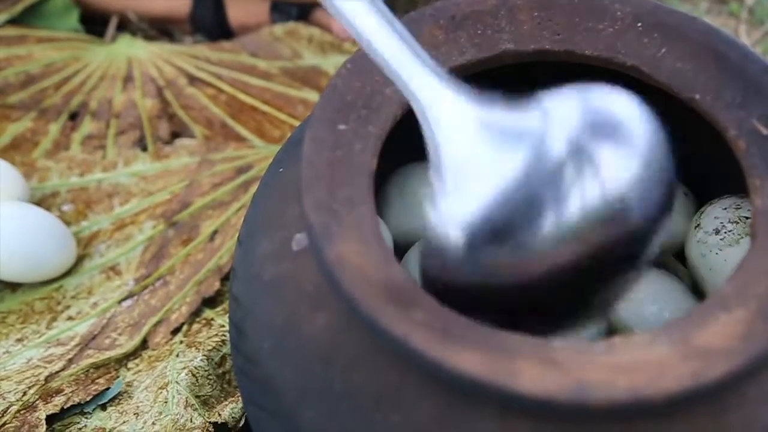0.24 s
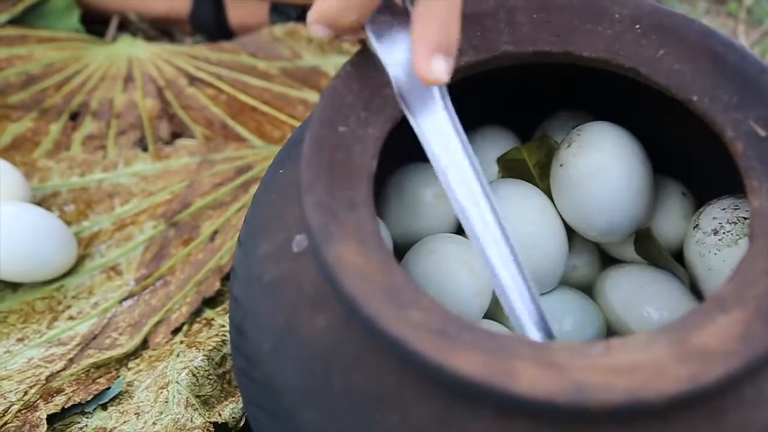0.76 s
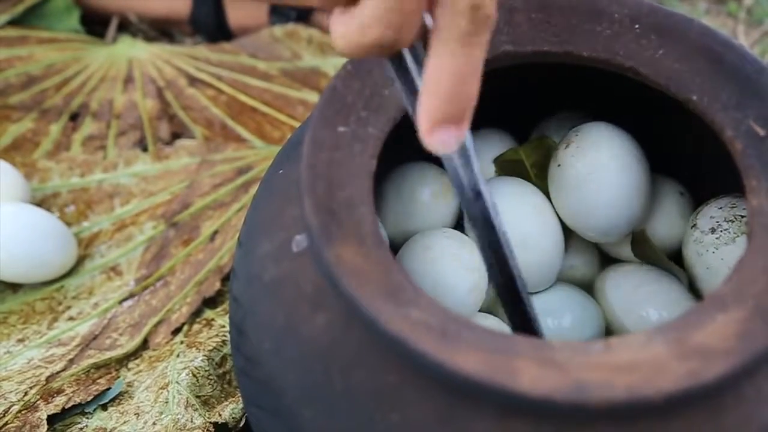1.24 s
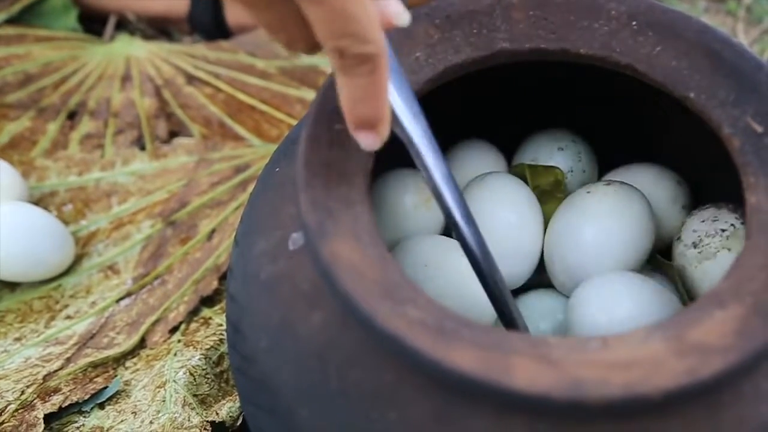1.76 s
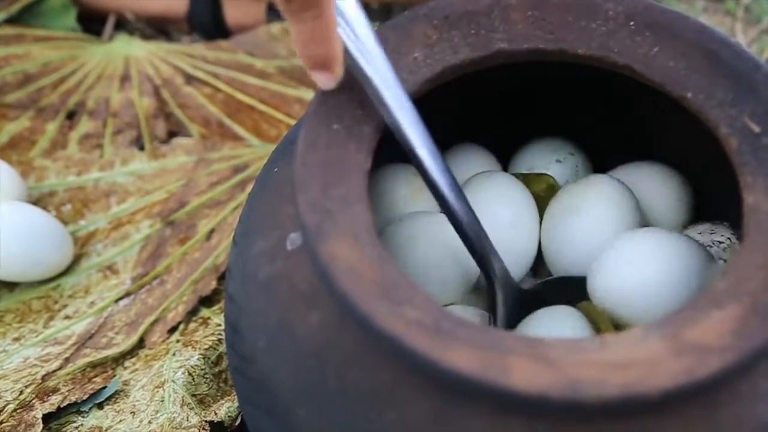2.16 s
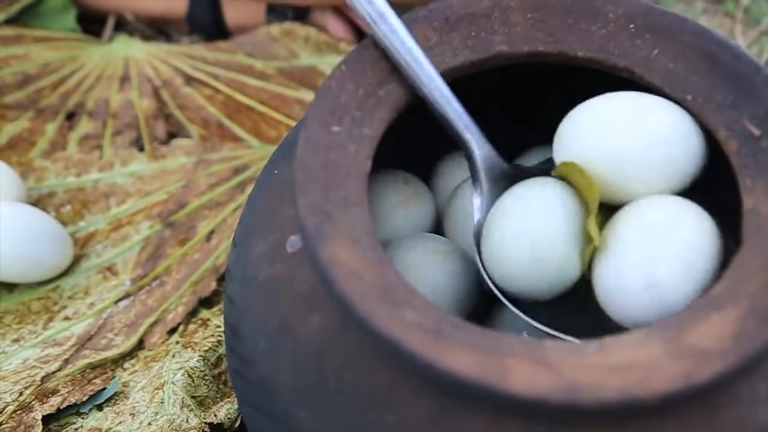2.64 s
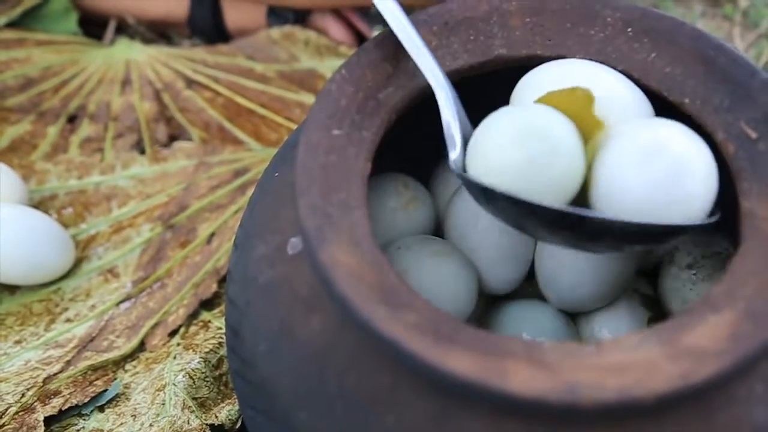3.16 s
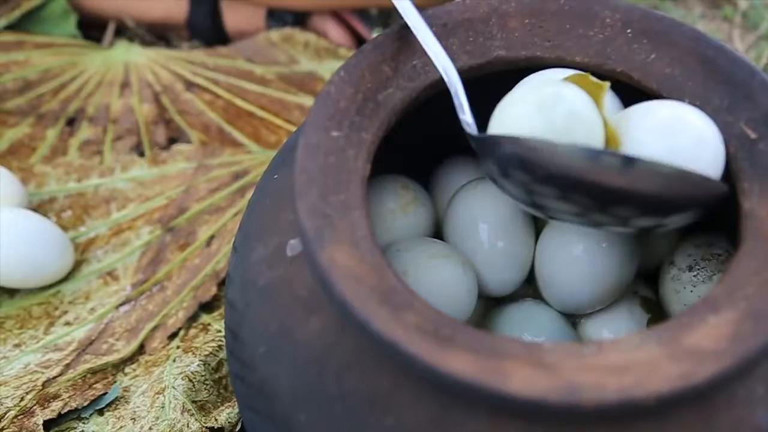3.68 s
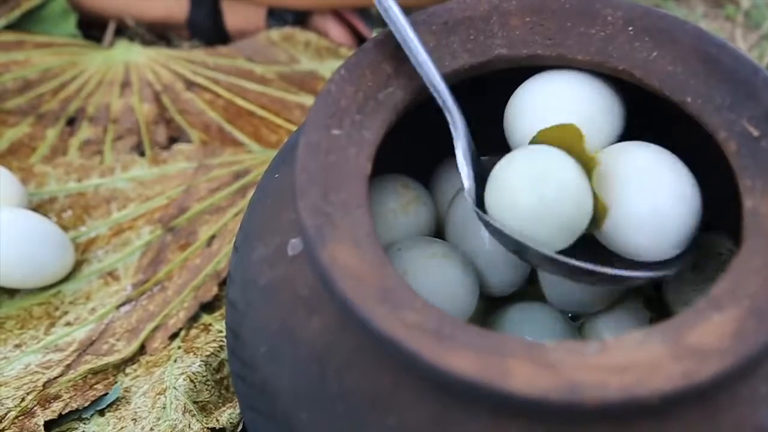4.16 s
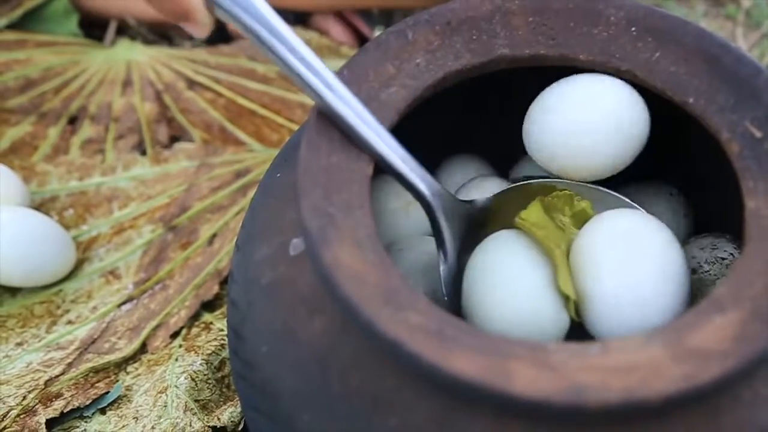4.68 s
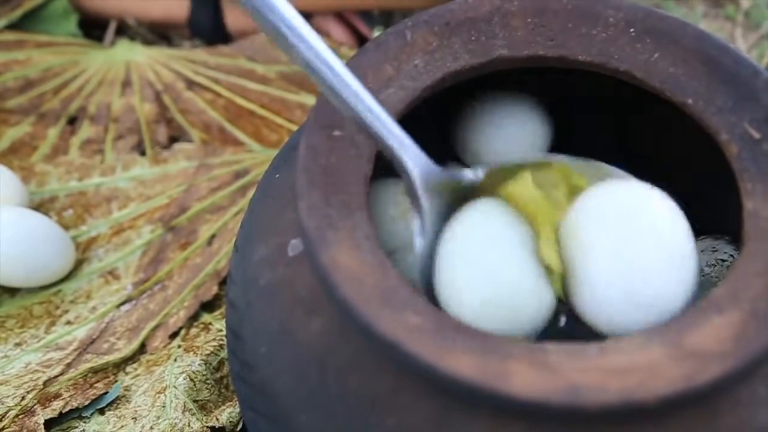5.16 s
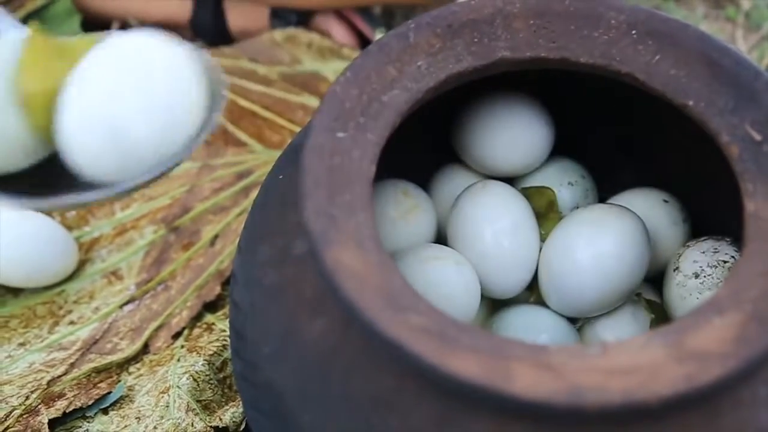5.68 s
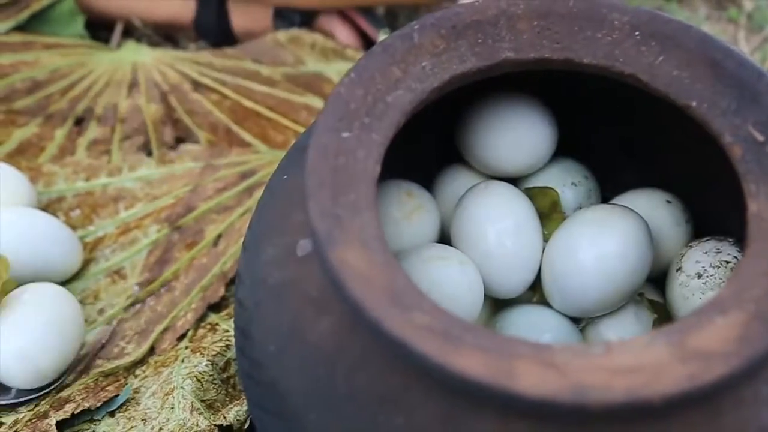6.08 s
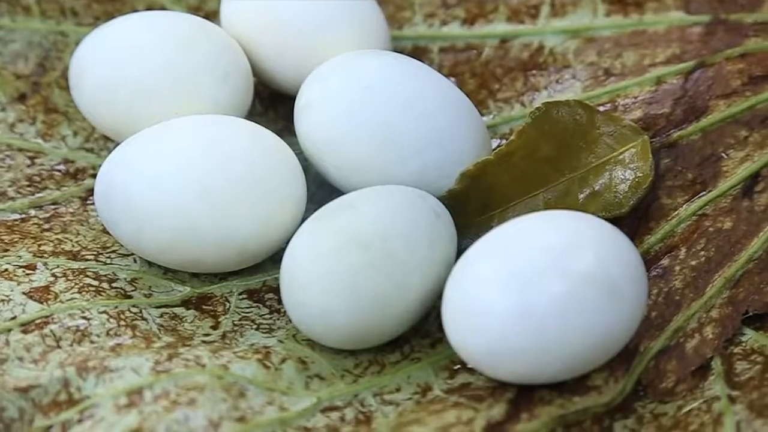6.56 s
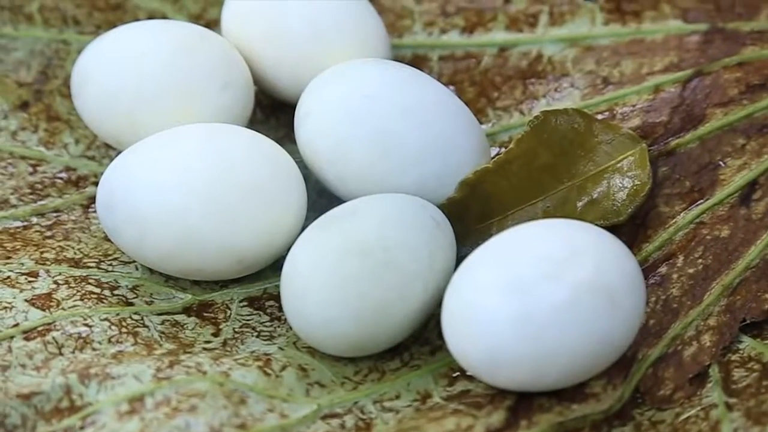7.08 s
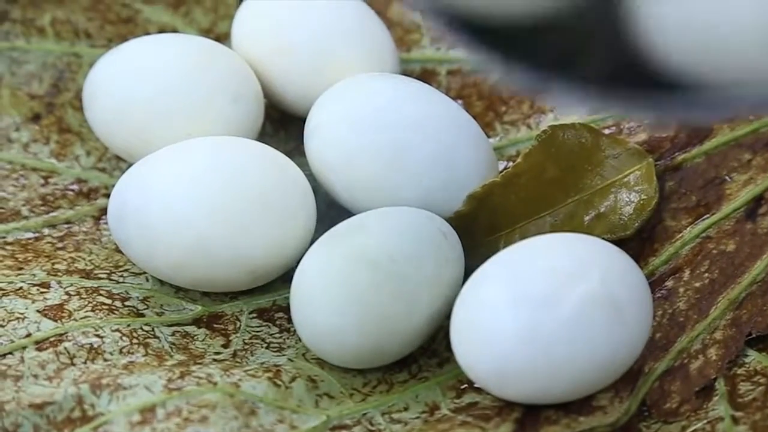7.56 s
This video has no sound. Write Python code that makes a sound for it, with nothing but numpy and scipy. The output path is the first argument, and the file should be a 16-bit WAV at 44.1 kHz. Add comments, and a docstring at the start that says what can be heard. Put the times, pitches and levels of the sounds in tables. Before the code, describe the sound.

Close to the microphone outdoors, low wind rumbles and flutters in uneven gusts over faint hiss. A steel ladle clinks into a clay pot, squeals briefly along its rim and clacks among eggs. Shells knock, scrape and tick, easing to faint contacts, then a dense hollow clatter. After a tiny dropout to silence, a few softer taps follow and only wind remains.

```python
"""Wind rumbles and flutters on a microphone over faint hiss and a thin high whine: shaped noise and a sine.
Then a steel ladle digs among eggs in a clay pot outdoors. Shells knock, crack and tick as short noise
bursts through resonances; the pot and the ladle's bowl answer with decaying modes.
Rubs, scrapes and rim squeals are dense random grains through resonances.
Late on, the sound drops out for an instant."""
import sys
import numpy as np
from scipy import signal
from scipy.fft import rfft, irfft
from scipy.io import wavfile
from scipy.ndimage import uniform_filter1d

SR = 44100
rng = np.random.default_rng(int(sys.argv[2]) if len(sys.argv) > 2 else 0)


def output_pcm(signal):
    """Save a mono or channel-first signal as 16-bit PCM at the path in sys.argv[1].

    Samples are clipped to [-1, 1] before scaling.
    """
    pcm = np.clip(np.atleast_2d(signal).T, -1, 1) * 32767
    wavfile.write(sys.argv[1], SR, np.round(pcm).astype(np.int16))


def volts(x):
    """Linear amplitude factor 10**(x/20) for a level x in dB, scalar or array-like."""
    e = np.asarray(x, float) / 20
    return 10 ** e


N = 345303  # length in samples


def rms_one(x):
    """Scale to rms 1."""
    return x / np.sqrt(np.mean(x ** 2) + 1e-20)


def peak_one(x):
    """Scale to a peak of 1."""
    return x / np.abs(x).max()


def in_time(rows):
    """Draw a (time, level) curve sample by sample."""
    s, level = np.transpose(rows)
    return np.interp(np.arange(N) / SR, s, level)


def band(x, low_hz, high_hz):
    """Band-pass."""
    edges = [low_hz, min(high_hz, SR / 2.2)]
    return signal.sosfilt(signal.butter(2, edges, "band", fs=SR, output="sos"), x)


def drift(rate):
    """Smooth random wander with a spread of about 1; a higher rate moves faster."""
    r = np.exp(-80 * np.pi * rate / SR)  # one step every 40 samples
    noise = rng.standard_normal(N // 40 + 2002)
    slow = signal.lfilter([1], [1, -2 * r, r * r], noise)[2000:]
    return np.interp(np.arange(N) / 40, np.arange(len(slow)), rms_one(slow))


def ring(x, hz, t60):
    """One vibrating mode: a unit click starts a decaying sine of height 1."""
    r, w = volts(-60 / (t60 * SR)), 2 * np.pi * hz / SR
    return signal.lfilter([0, np.sin(w)], [1, -2 * r * np.cos(w), r * r], x + 1e-18)


def resonance(x, hz, width_hz):
    """A resonance with gain 1 on top."""
    r = np.exp(-np.pi * width_hz / SR)
    poles = [1, -2 * r * np.cos(2 * np.pi * hz / SR), r * r]
    return signal.lfilter([(1 - r * r) / 2, 0, (r * r - 1) / 2], poles, x)


def coloured(spectrum):
    """Noise of a given spectrum, rms 1."""
    hz = np.maximum(np.arange(N // 2 + 1) * SR / N, 1)
    table_hz, table_db = np.transpose(spectrum)
    db = np.interp(np.log(hz), np.log(table_hz), table_db)
    return rms_one(irfft(rfft(rng.standard_normal(N)) * volts(db), N))


def grains(per_s, spread_db, clump_db):
    """Uneven micro-contacts of a rough surface, about per_s before clumping; rms 1."""
    sizes = volts(spread_db * np.minimum(rng.exponential(1, N), 4)) * rng.choice([-1, 1], N)
    chance = per_s * volts(clump_db * drift(40)) / SR
    return rms_one(sizes * (rng.random(N) < chance))


# wind strength on the microphone: start_s, rumble_db
WIND = [(0.0, -24.5), (0.05, -16.5), (0.74, -26.5), (0.83, -15.5), (1.0, -24), (1.2, -26.5), (1.35, -17.5),
        (1.4, -31.5), (1.72, -17), (1.9, -19.5), (2.55, -17.5), (2.6, -22), (2.75, -14.5), (2.85, -22.5),
        (3.16, -25.5), (3.31, -19), (3.5, -21.5), (3.55, -16.5), (3.66, -17.5), (3.75, -13), (3.9, -16),
        (4.1, -14), (4.34, -19), (4.48, -14.5), (4.7, -19), (4.97, -22.5), (5.17, -16), (5.24, -27),
        (5.49, -26), (5.53, -17), (5.65, -21), (5.75, -15), (6.3, -15.5), (6.65, -22), (7.28, -22),
        (7.33, -14.5), (7.7, -19.5), (7.83, -14.5)]
# hiss strength: start_s, level_db
HISS_LEVEL = [(0.0, -44.5), (1.35, -46.5), (1.79, -43.5), (7.83, -50.5)]
# relative noise spectra of the three layers, per Hz: freq_hz, density_db
RUMBLE_SPECTRUM = [(8.8, -7.5), (15, 6), (59, 1.5), (92, 3), (200, -23), (260, -28.5), (440, -120)]
FLUTTER_SPECTRUM = [(110, 5.5), (150, 11.5), (220, 3), (320, -6.5), (500, -44)]
HISS_SPECTRUM = [(200, -10), (320, 0), (600, -4), (1000, -7), (2000, -10), (4000, -15), (9000, -19),
                 (10500, -24), (15600, -27), (15900, -60)]
# flutter at a rumble of -20 dB, before its random swings; dB gained per dB of rumble
FLUTTER_DB, FLUTTER_STEEPNESS = -37.5, 2.07
WHINE_HZ, WHINE_DB = 15661, -64  # rms


def air():
    """Wind pressure as low noise, a flutter that grows faster than the rumble, hiss and a sine whine."""
    rumble_db = in_time(WIND)
    flutter_db = FLUTTER_DB + FLUTTER_STEEPNESS * (rumble_db + 20) + 2.34 * drift(4.6)
    rumble = coloured(RUMBLE_SPECTRUM)
    # gusts come in lumps of fairly even strength
    rumble = rms_one(rumble / (uniform_filter1d(rumble ** 2, size=3500) + 0.3) ** .5)
    flutter = coloured(FLUTTER_SPECTRUM) * volts(flutter_db + 4.44 * drift(51.5))
    hiss = coloured(HISS_SPECTRUM) * volts(in_time(HISS_LEVEL) + .8 * drift(8))
    whine = np.sqrt(2) * volts(WHINE_DB) * np.sin(2 * np.pi * WHINE_HZ * np.arange(N) / SR)
    return rumble * volts(rumble_db) + flutter + hiss + whine


def ticks():
    """Faint settling of wet shells while the ladle is in the pot: grains smeared over milliseconds."""
    t = np.arange(N) / SR
    lone = grains(36, spread_db=2.5, clump_db=4.0) * ((t > .45) & (t < 5.4))
    envelope = signal.lfilter([1], [1, -volts(-60 / (0.023 * SR))], np.abs(lone))  # t60 of 23 ms
    puffs = envelope * rng.standard_normal(N)
    return volts(-57.5) * rms_one(band(puffs, 1400, 5600))


# modes of the steel ladle: freq_hz, level_db, t60_s, family (the column of CLINKS that drives it)
LADLE = [(1077, -12, .1, 1), (1495, -14, .16, 1), (1906, -16, .12, 1), (2234, -12, .1, 1),
         (3623, -4, .5, 2), (5157, 3, .33, 3), (5696, -8, .08, 3), (7200, -4, .08, 4), (8570, 0, .06, 4),
         (9480, -2, .08, 4), (10250, -5, .08, 4), (12650, -5, .05, 4), (14150, -4, .04, 4),
         (14500, -1, .04, 4), (14840, -4, .06, 4)]
# clinks of the freely swinging bowl: start_s, lower_modes_db, mode_3600_hz_db, mode_5200_hz_db, upper_modes_db
CLINKS = [(0.4587, -15, -41, -35.5, -41), (0.4823, -24, -26.5, -42, -38), (0.506, -43, -52, -60, -56),
          (0.612, -52, -50, -62, -46), (0.6704, -25.5, -55, -56, -43), (0.6968, -37, -38, -45, -40),
          (0.722, -40, -55, -56, -50), (4.1518, -28, -48, -61, -55), (4.4563, -43, -60, -66, -47),
          (4.565, -48, -60, -83, -52), (4.6443, -25, -55, -74, -41), (4.9671, -38, -55.5, -67, -49)]
BOWL_TOUCHES_S, BOWL_MUTE_S = 0.726, 0.02  # the bowl sinks among the eggs and its ringing dies


def clinks(spread_db):
    """Every clink sets the modes of the free bowl ringing, by family and with some chance."""
    rows = np.array(CLINKS)
    at = np.round(rows[:, 0] * SR).astype(int)
    luck, out = rng.standard_normal((len(at), len(LADLE))), np.zeros(N)
    for k, (hz, db, t60, family) in enumerate(LADLE):
        clicks = np.zeros(N)
        clicks[at] = volts(rows[:, round(family)] + db + spread_db * luck[:, k])
        out += ring(clicks, hz, t60) * (-1) ** k
    # silence the ringing for the rest of a second, until later clinks may sound
    since = np.arange(N) / SR - BOWL_TOUCHES_S
    return out * np.where(since < 1, np.clip(1 - since / BOWL_MUTE_S, 0, 1), 1)


# resonances of the heap of eggs: freq_hz, width_hz, level_db
HEAP = [(693, 98, 0), (1050, 430, -2), (1457, 310, -1), (1774, 144, 5.5), (2107, 460, 1.5),
        (2460, 180, 1.5), (2665, 225, -1), (3530, 230, -4), (4200, 280, -8.5)]


def heap(x, luck_db):
    """The resonances of the eggs lying in the pot; each touch favours other ones."""
    return sum(volts(db + luck) * resonance(x, hz, width) * (-1) ** k
               for k, ((hz, width, db), luck) in enumerate(zip(HEAP, luck_db)))


# modes of the clay pot: freq_hz, level_db, t60_s
POT = [(351.5, -4.5, 0.11), (391.7, -2, 0.049), (583, 1.5, 0.013), (735, -18, 0.13), (909.5, -12, 0.094)]


def pot(x):
    """The modes of the clay wall and of the air inside."""
    return sum(volts(db) * ring(x, hz, t60) * (-1) ** k for k, (hz, db, t60) in enumerate(POT))


# shell contacts: start_s, knock_peak_db, knock_pitch_hz, thump_into_pot_db, crack_db
CONTACTS = [(0.459, -6.5, 1067, -17, -50), (0.4594, -17, 2540, -51, -29), (0.4834, -18, 1090, -29, -37),
            (0.6698, -31, 1880, -41, -43), (0.697, -15, 990, -23, -39), (0.8861, -20.5, 1760, -24, -23.5),
            (0.969, -39, 5370, -45, -34), (0.9833, -12.5, 2580, -22, -26.5),
            (1.0179, -10.5, 3000, -28, -27.5), (1.1691, -24, 1720, -52, -43), (1.244, -26, 1740, -47, -44),
            (1.343, -16.5, 2020, -25.5, -31), (1.3517, -4, 1920, -30, -22), (1.397, -26.5, 2450, -50, -59),
            (1.4153, -27, 900, -49, -34.5), (1.439, -34, 1850, -50, -48), (1.5267, -18, 600, -24, -30),
            (1.5474, -15.5, 690, -25, -55), (1.6014, -40, 1450, -43, -39), (1.653, -33, 2230, -36, -43),
            (1.6701, -13.5, 735, -24.5, -35), (1.672, -14, 2360, -37, -41), (1.8506, -28.5, 3180, -37, -45),
            (1.875, -28, 805, -33, -62), (2.002, -29, 1860, -26, -60), (2.0273, -7, 2380, -28, -24),
            (2.055, -20.5, 2440, -45, -38), (2.1444, -24.5, 786, -31, -36), (2.2056, -23.5, 2400, -43, -45),
            (2.385, -32, 3060, -51, -52), (2.4096, -26, 1050, -24.5, -59), (2.4472, -22.5, 730, -27, -46),
            (2.624, -18, 1800, -39, -53), (2.6338, -14, 1830, -20.5, -33.5), (2.672, -30, 3950, -27, -30.5),
            (2.6756, -18, 1050, -26, -51), (2.8756, -30, 2220, -64, -43.5), (2.9848, -21, 1040, -24.5, -64),
            (3.3446, -37, 970, -49, -37.5), (3.37, -47, 740, -39, -35), (3.3963, -25, 3020, -45, -46),
            (3.4392, -36, 2500, -53, -41), (3.6112, -46, 970, -54, -41.5), (3.649, -26, 955, -46, -47),
            (3.7394, -31, 2500, -53, -46), (3.773, -25, 2320, -50, -40), (3.935, -28, 2140, -44, -40.5),
            (4.1523, -48, 1100, -54, -39.5), (4.2635, -43, 2000, -58, -46), (4.2877, -38, 738, -40, -43),
            (4.325, -21.5, 940, -28, -60), (4.4028, -26, 1760, -45, -51), (4.436, -26, 2000, -55, -50),
            (4.4591, -21, 1980, -64, -37), (4.5065, -46, 886, -42, -42), (4.3702, -30, 1900, -53, -44),
            (4.569, -46, 1840, -60, -44), (4.6013, -31, 1950, -51, -44), (4.661, -30, 2800, -51, -43),
            (4.645, -43, 1930, -51, -41), (4.8754, -18.5, 1670, -16.5, -33),
            (4.8987, -10, 2770, -18, -23.5), (5.064, -31.5, 2660, -35, -54), (5.1233, -9.5, 1940, -22, -38),
            (5.1715, -10, 830, -22.5, -35), (5.1992, -21, 1950, -35, -61), (5.251, -22.5, 1040, -28, -51),
            (5.265, -24, 860, -23, -58), (5.2785, -13, 1300, -17, -60), (5.2875, -5, 990, -15, -39),
            (5.2928, -14, 820, -29, -34), (5.298, -14, 1890, -38, -25), (5.3057, -9.5, 710, -21, -30),
            (5.3106, -18.5, 3680, -17.5, -31), (5.3202, -16, 2200, -22, -37),
            (5.3368, -9.5, 2490, -19.5, -30.5), (5.391, -35, 2300, -35.5, -69),
            (5.3422, -15, 2350, -19.5, -39), (6.142, -23.5, 1780, -30, -39.5),
            (6.2523, -34, 1030, -44, -50), (6.2715, -24, 2900, -38.5, -32), (6.301, -23, 1980, -55, -39),
            (6.556, -17, 1490, -50, -42), (6.569, -39, 2130, -59, -37)]
RATTLE_S = 0.038  # t60 of every rattle
SHELL_LOW, SHELL_HIGH = 0.39, 2.34  # band edges of a knock, as multiples of its pitch


def knocks(lead_db, crack_share, crack_top_hz, width_hz, heap_db, broad_db, grit_db):
    """Shell on shell: a blow and gritty rattle through the shell's tone, a bright crack, a thump into the pot."""
    size = 6000
    out, thumps, t = np.zeros(N + size), np.zeros(N + size), np.arange(size) / SR
    rattle = rng.standard_normal((len(CONTACTS), 3, size))
    blow = np.pad(np.hanning(9), (10, 5981))  # a fifth of a millisecond of contact
    for (s, db, hz, pot_db, crack_db), (dull, bright, lumps) in zip(CONTACTS, rattle):
        # the rattle builds up quickly and chatters in millisecond lumps
        shape = (1 - np.exp(-t / 0.0013)) * volts(grit_db * np.repeat(lumps[:150], 40))
        burst = volts(lead_db) * blow + dull * shape * volts(-60 * t / RATTLE_S)

        tone = peak_one(resonance(burst, hz, width_hz))
        broad = peak_one(band(burst, 840, 4100))
        eggs = peak_one(heap(burst, 3.0 * lumps[-len(HEAP):]))
        knock = tone + volts(broad_db) * broad + volts(heap_db) * eggs
        knock = peak_one(band(knock, SHELL_LOW * hz, SHELL_HIGH * hz))

        crack = band(bright * shape * volts(-60 * t / (crack_share * RATTLE_S)), 2800, 16000)
        crack = signal.lfilter(*signal.butter(1, crack_top_hz, fs=SR), crack)
        crack = crack - 0.5 * resonance(crack, 10500, 2400)  # a hollow in the crack's treble
        crack = crack / np.std(crack[:300])  # level set over the first 7 ms

        at = round(s * SR)
        out[at:at + size] += volts(db) * knock + volts(crack_db) * crack
        thumps[at:at + size] += volts(pot_db) * burst / volts(lead_db) / blow.sum()
    return (out + pot(thumps))[:N]


# shells rolling dully on shells and clay: start_s, end_s, body_db, squeal_hz, squeal_db
RUBS = [(0.514, 0.538, -49, 1090, -39), (0.682, 0.78, -45.5, 1400, -49), (0.594, 0.632, -45.5, 4200, -51),
        (0.833, 0.89, -42.5, 5480, -48), (0.886, 0.946, -52, 955, -46), (1.094, 1.137, -42.5, 1760, -37),
        (1.356, 1.402, -47, 881, -33.5), (1.42, 1.487, -42, 900, -42), (1.58, 1.655, -42, 1430, -60),
        (1.944, 1.99, -44.5, 2680, -48), (2.015, 2.066, -29.5, 2220, -49), (2.37, 2.416, -41, 2990, -46),
        (2.418, 2.497, -45.5, 1620, -48), (2.608, 2.661, -34.5, 1827, -35), (2.69, 2.774, -41, 2690, -44),
        (2.867, 2.945, -43.5, 1875, -50), (4.883, 4.946, -41, 1450, -40),
        (5.117, 5.261, -43.5, 1846, -44.5), (5.287, 5.323, -33, 1900, -29.5),
        (5.359, 5.353, -31, 2450, -28), (6.28, 6.344, -48, 1960, -59), (6.562, 6.591, -39, 1050, -43),
        (6.611, 6.645, -41.5, 2050, -40)]
# steel scraping grittily along shells: start_s, end_s, body_db, squeal_hz, squeal_db
SCRAPES = [(1.245, 1.338, -34, 3080, -46), (1.518, 1.556, -32, 745, -51), (1.662, 1.74, -36, 2270, -44),
           (1.168, 1.232, -38, 1470, -43), (3.31, 3.496, -49.5, 2390, -67), (3.608, 3.705, -49, 940, -44.5),
           (4.141, 4.3, -43, 2110, -53), (4.32, 4.596, -44, 1910, -50), (4.392, 4.51, -54.5, 4200, -57),
           (4.626, 4.745, -47.5, 14000, -54), (6.244, 6.274, -33, 1020, -39)]
RUB_GRIT_DB, SCRAPE_GRIT_DB = -28, -10  # treble grit against the body of a stroke


def rubbing(edge_s, squeal_width_hz):
    """Dense grains feed the heap, the pot, the ladle and one narrow squeal for each stroke."""
    rough, t = grains(3000, spread_db=4.0, clump_db=4.5), np.arange(N) / SR
    # only the ladle's modes from 5.7 kHz up
    steel = rms_one(sum(volts(db) * ring(rough, hz, t60) for hz, db, t60, family in LADLE[6:]))
    clay = volts(-3.0) * rms_one(pot(rough))
    grit = rms_one(band(rough, 2500, 16000)) + volts(-4) * steel
    grit = grit + volts(-4.0) * rms_one(band(rough, 3200, 9800))

    strokes = [(*row, RUB_GRIT_DB) for row in RUBS] + [(*row, SCRAPE_GRIT_DB) for row in SCRAPES]
    out, luck_db = np.zeros(N), 2.5 * rng.standard_normal((len(strokes), len(HEAP)))
    for (start, end, body_db, hz, squeal_db, grit_db), luck in zip(strokes, luck_db):
        part = slice(round((start - edge_s) * SR), round((end + edge_s) * SR))
        corners = [start - edge_s, start + edge_s, end - edge_s, end + edge_s]
        pressure = np.interp(t[part], corners, [0, 1, 1, 0])
        body = rms_one(heap(rough[part], luck)) + clay[part]
        width_hz = squeal_width_hz * max(hz / 1800, 1)  # higher squeals are wider
        squeal = rms_one(resonance(rough[part], hz, width_hz))
        stroke = volts(body_db) * body + volts(body_db + grit_db) * rms_one(grit[part])
        out[part] += pressure * (stroke + volts(squeal_db) * squeal)
    return out


# squeals of the sliding rim: start_s, end_s, from_hz, to_hz, from_db, to_db
SLIDES = [(0.70, 0.81, 1150, 1290, -40, -48), (0.715, 0.80, 1620, 1680, -49, -44),
          (0.79, 0.884, 1680, 1745, -39, -30), (0.70, 0.884, 1915, 1960, -44, -47),
          (1.166, 1.24, 1720, 1880, -32, -39), (1.243, 1.33, 1780, 1900, -36, -38)]


def slides(edge_s, width_hz):
    """The rim slides on: grains through a narrow moving resonance, a gritty squeal that climbs in pitch."""
    rough, out = grains(3000, spread_db=3.0, clump_db=3.0), np.zeros(N)
    r = np.exp(-np.pi * width_hz / SR)
    for start, end, from_hz, to_hz, from_db, to_db in SLIDES:
        part = slice(round(start * SR), round(end * SR))
        way = np.linspace(0, 1, part.stop - part.start)
        # shift the gliding pitch down to zero, smooth, and shift back up
        turn = np.exp(2j * np.pi * np.cumsum(from_hz + (to_hz - from_hz) * way) / SR)
        smooth = signal.lfilter([1], [1, -r], rough[part] / turn)
        squeal = rms_one(np.real(turn * smooth))
        edges = np.clip(np.minimum(way, 1 - way) * (end - start) / edge_s, 0, 1)
        out[part] += edges * volts(from_db + (to_db - from_db) * way) * squeal
    return out


def damped_bowl(blows, modes, spread_db):
    """Each blow sets the damped modes of the bowl ringing, with some chance."""
    s, db = np.transpose(blows)
    luck, out = rng.standard_normal((len(s), len(modes))), np.zeros(N)
    for k, (hz, mode_db, t60) in enumerate(modes):
        clicks = np.zeros(N)
        clicks[np.round(s * SR).astype(int)] = volts(db + mode_db + spread_db * luck[:, k])
        out += ring(clicks, hz, t60) * (-1) ** k
    return out


# modes of the bowl wedged among the eggs: freq_hz, level_db, t60_s
WEDGED = [(960, -24, .14), (1497, -18, .2), (1718, 0, .047), (1960, -6, .038), (3040, -11, .025),
          (3530, -14, .03)]
# its clacks: start_s, level_db
CLACKS = [(0.8868, -20.5), (0.9798, -12.5), (0.9838, -19), (0.9935, -18.5), (1.0181, -4.5)]


def wedged_clacks():
    """The bowl wedged among the eggs clacks: its modes die quickly."""
    return damped_bowl(CLACKS, WEDGED, spread_db=3.0)


# modes of the bowl with eggs lying in it: freq_hz, level_db, t60_s
LOADED = [(1050, -9, .085), (1500, -11, .06), (2075, 0, .095), (2760, -9, .06), (3430, -17, .05)]
# its taps: start_s, level_db
TAPS = [(4.9585, -32.5), (6.2425, -53), (6.3016, -46), (6.5572, -17), (6.583, -35.5), (6.609, -27),
        (6.620, -40), (6.631, -37)]


def loaded_taps():
    """The bowl with eggs in it is tapped: the load damps its modes."""
    return damped_bowl(TAPS, LOADED, spread_db=3.0)


def scene():
    """All sources meet at one microphone."""
    shells = knocks(lead_db=7, crack_share=0.64, crack_top_hz=6200, width_hz=167, grit_db=3.5,
                    heap_db=-4, broad_db=-9)
    strokes = rubbing(edge_s=0.01, squeal_width_hz=25) + slides(edge_s=0.0041, width_hz=24)
    bowl = clinks(spread_db=1.5) + wedged_clacks() + loaded_taps()
    return (air() + ticks() + shells + strokes + bowl)[None]


def roll_off(x):
    """The treble ends steeply here."""
    return signal.sosfilt(signal.butter(12, 16500, fs=SR, output="sos"), x)


# the moment of silence: start_s, end_s
DROPOUT = (6.161, 6.240)


def record(dry):
    """The top is cut, full scale clips, and the sound drops out once."""
    x = signal.sosfilt(signal.cheby2(12, 50, 16200, fs=SR, output="sos"), dry)
    t = np.arange(N) / SR
    sounding = (t < DROPOUT[0]) | (t > DROPOUT[1])
    return roll_off(np.clip(x, -1, 1) * sounding)


dry = scene()
out = record(dry)
output_pcm(out)
```